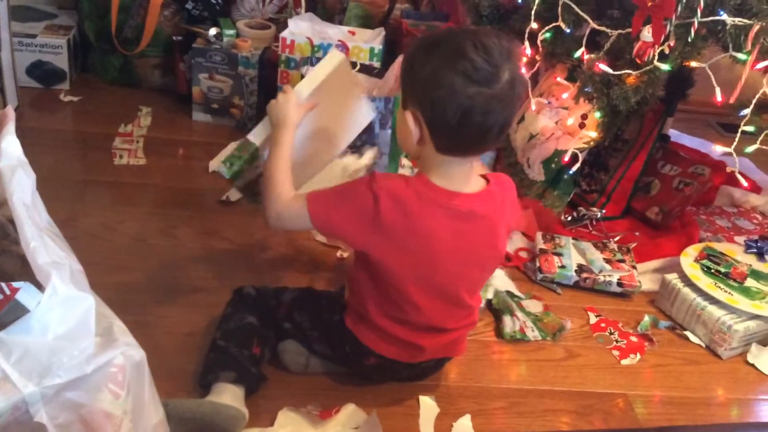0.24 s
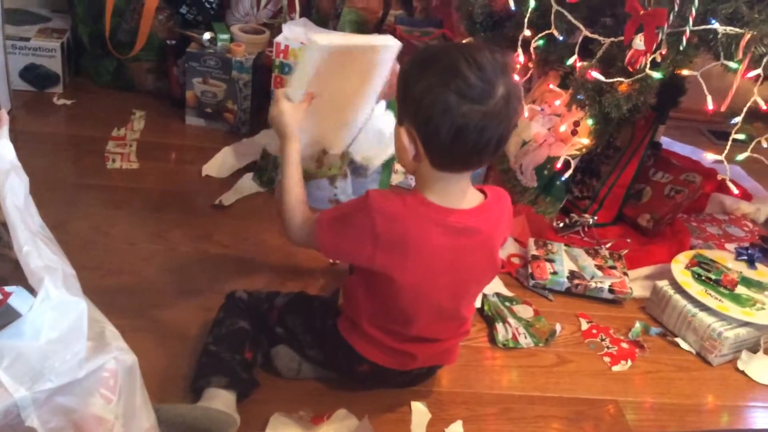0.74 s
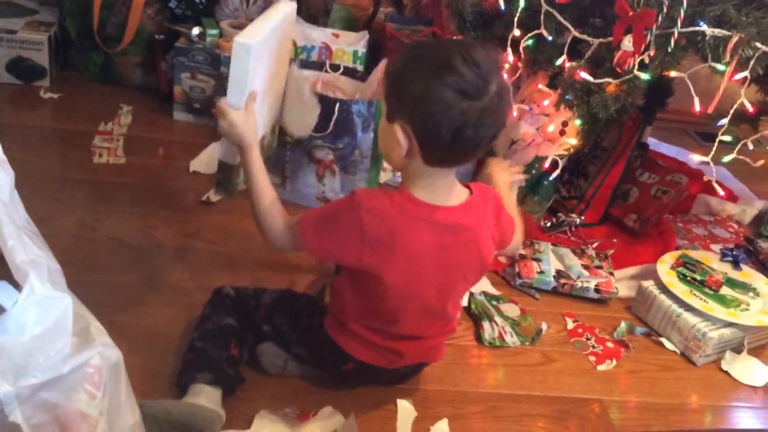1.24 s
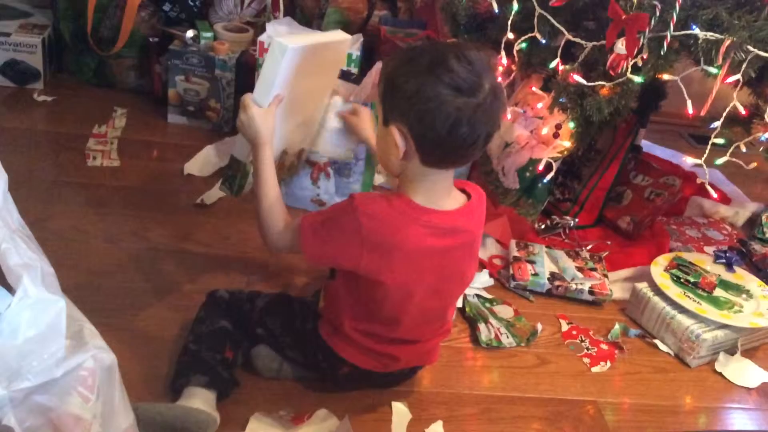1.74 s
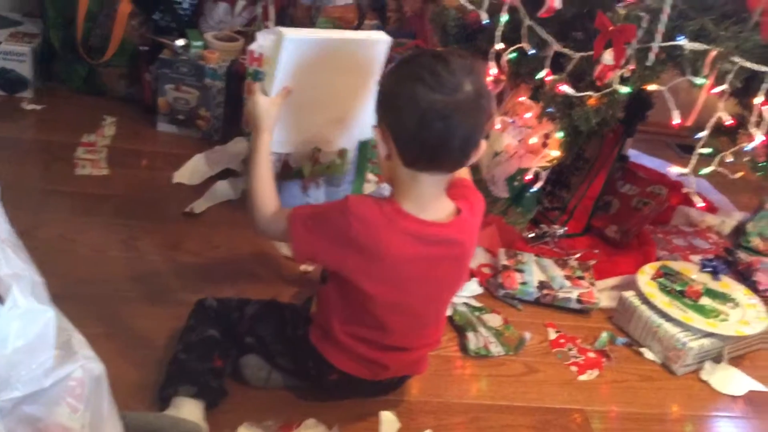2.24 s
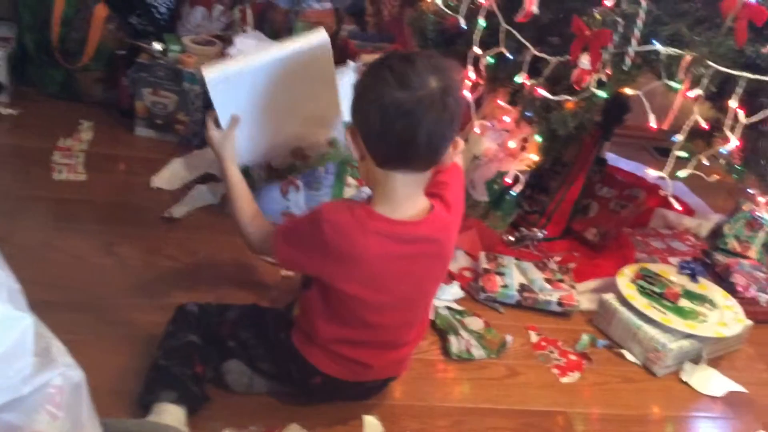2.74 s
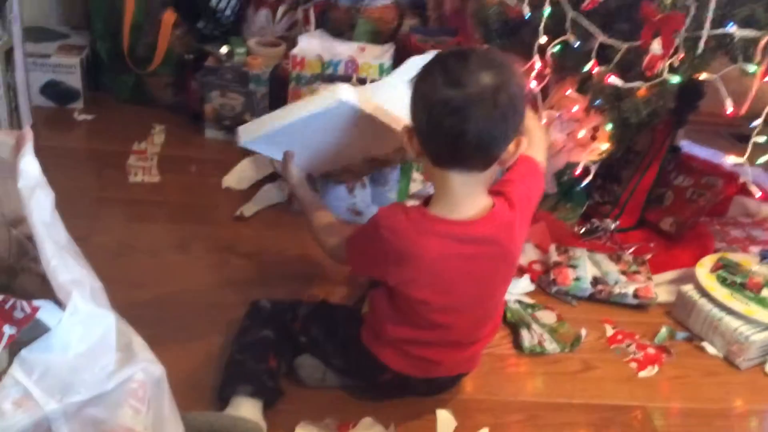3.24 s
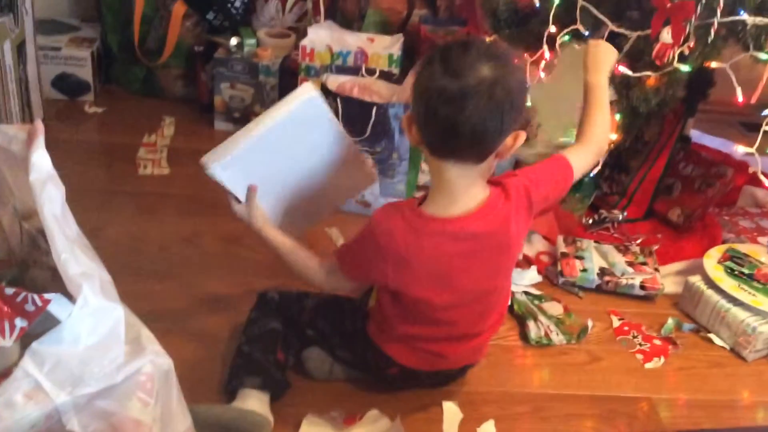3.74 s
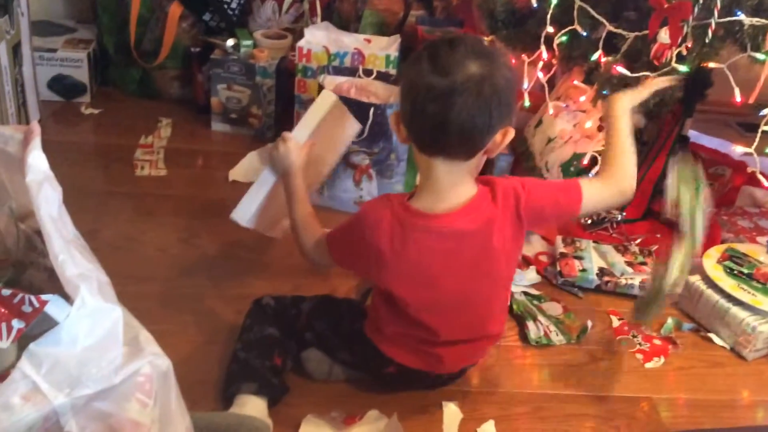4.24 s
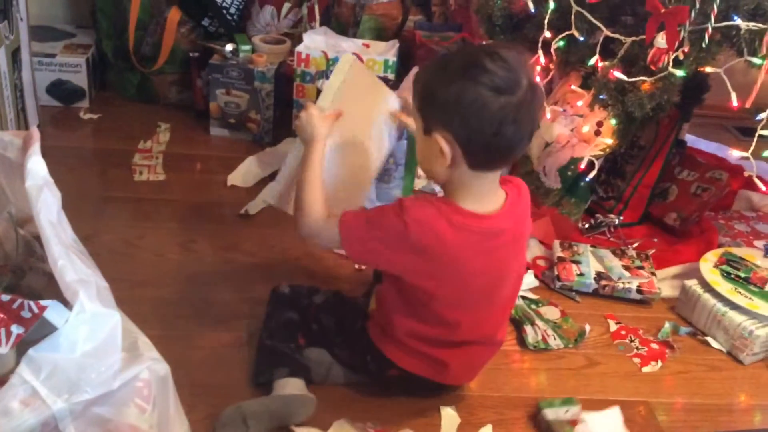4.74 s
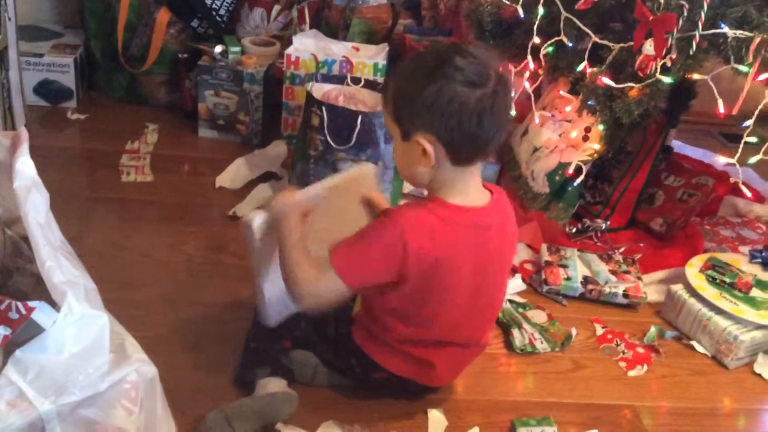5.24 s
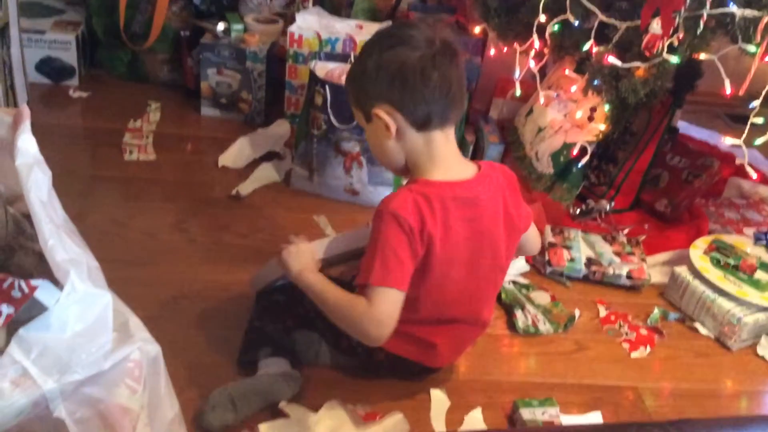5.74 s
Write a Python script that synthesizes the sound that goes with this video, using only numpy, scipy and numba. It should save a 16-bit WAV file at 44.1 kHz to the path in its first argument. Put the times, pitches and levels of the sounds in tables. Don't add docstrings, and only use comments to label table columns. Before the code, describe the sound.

A couple of metres from a phone in a quiet, softly humming living room, hands tear thin gift wrap off a box. Crackles and snapping folds lead to two jerky rips, a pause with small rustles, then the hardest rip frees the sheet. It flutters, lands with a papery slap, and quieter handling ends with a dull hollow box knock.

```python
import sys
import numpy as np
from scipy import signal
from scipy.fft import rfft, irfft
from scipy.io import wavfile
from scipy.ndimage import uniform_filter1d, map_coordinates
from numba import njit

SR = 44100
rng = np.random.default_rng(int(sys.argv[2]) if len(sys.argv) > 2 else 0)


def magnitude_from_level(level_db):
    exponent = np.asarray(level_db, float) / 20
    return 10 ** exponent


def wav_out(sig):
    wavfile.write(sys.argv[1], SR, np.round(np.clip(np.atleast_2d(sig).T, -1, 1) * 32767).astype(np.int16))


N = 263718

# [f/Hz, density/dB per Hz]
HUM_SPECTRUM = [(15, -42), (25, -6), (117, 0), (206, 2.5), (326, -8.5), (427, -5.5), (531, -13.5),
                (754, -17), (1440, -25), (1790, -27), (3160, -31.5), (3430, -31.5), (10400, -33.5),
                (14800, -35), (16000, -46)]
HUM_DB = -59.5

# [f/Hz, density/dB per Hz]
PAPER_SPECTRUM = [(65, -42), (110, -9.5), (350, -20), (396, 0.5), (486, -5), (766, -3), (904, -6.5),
                  (1130, -1), (2340, -1), (3920, 0.5), (4520, 0.5), (12700, -6), (15300, -9)]
LOW_HZ, TOP_HZ = 110, 15350
USUAL_FLAP_DB, USUAL_CRISP_DB = -12, -3

# [t/s, level/dB, crispness/dB]
HANDLING = [(0, -68.5, -4.5), (.42, -73, -8), (1.05, -64.5, -9), (1.3, -69.5, -2), (1.34, -84, -6),
            (1.45, -95, -6), (1.56, -69.5, -9), (2.15, -72, -5), (2.42, -82, -10.5), (2.7, -78, -9),
            (3.72, -70, -24), (4.05, -70.5, -27), (4.08, -60, -25), (4.32, -66.5, -25), (4.37, -70, -19),
            (4.7, -70.5, 1), (5.3, -73, -11), (5.98, -69, 2)]
HANDLING_FLAP_DB = -1.5
# [peak t/s, peak level/dB, 20 dB
# fall/s, flap/dB, crispness/dB]
RUSTLES = [(0.053, -60, -0.14, -18, -8), (0.234, -34.5, 0.0362, -12.5, -13), (.27, -54.5, .2, -3.5, -9.5),
           (.46, -60, 0.44, 0.5, -6), (.544, -60, 0.5, -27, -3), (.65, -47.5, 0.32, -36, -17),
           (1.166, -52.5, 0.06, -16, -14), (1.47, -56, 0.06, -7, -2.5), (1.503, -50, 0.07, -14, -13.5),
           (2.205, -52, 0.05, -5, 3.5), (2.264, -57, 0.1033, -3, 5), (2.29, -68.5, 0.3, -7, -7),
           (2.638, -66, 0.15, 7, -8.5), (2.76, -41.5, 0.06, -16, -16.5), (2.834, -49, 0.11, -2.5, -7),
           (2.906, -54.5, .11, -12, -7), (3.818, -60.5, 0.6, -11, -12), (3.995, -61.5, 0.86, -12, -6.5),
           (4.65, -57.5, 0.07, -5.5, -8), (4.621, -40, -0.03, 1, -10), (5.074, -66.5, 0.16, 10, -20),
           (5.642, -66, 0.17, 17, -20), (5.827, -59, -0.36, 16, -5),
           (1.28, -63.5, -0.17, -15, 0.5), (3.92, -67, 0.1, 12, -17), (4.78, -65, -0.4, -14, -2),
                 (4.97, -67, 0.14, 0, -10), (5.13, -71, 0.1, -7, 0), (5.23, -70, 0.37, -2, 2),
                 (5.43, -66, 0.1, 2, -4), (5.8, -64.5, 0.24, 3, 1), (5.86, -63.5, -0.5, -6, 4.5)]
RUSTLE_SWELL_S = 0.029
# [t/s, pull level/dB, tautness/dB]
RIPS = [
    [(0.706, -56, -6), (0.74, -60, -14), (0.748, -35, -22), (0.768, -44, -3), (0.794, -32, 2.5),
     (0.804, -34, 0), (0.94, -32, 0), (1.05, -66.5, -8)],
    [(1.67, -71, 0), (1.688, -51, -19), (1.71, -57.5, -15), (1.728, -50, -15), (1.776, -52, -7),
     (1.822, -43.5, -12), (1.9, -38.5, 5), (1.974, -43.5, 3.5), (2.114, -69.5, -11)],
    [(3.0, -64, -8), (3.052, -41.5, -3.5), (3.122, -34, -1.5), (3.205, -47.5, -1)],
    [(3.205, -51, -5), (3.214, -30, -0.5), (3.264, -24.5, -3.5), (3.34, -47, -6)],
    [(3.34, -36.5, -10), (3.376, -35.5, -8.5), (3.464, -40.5, -3), (3.532, -54, -14.5), (3.582, -53, -20),
     (3.602, -54, -22), (3.72, -70, -11)],
    [(4.389, -59, -8), (4.394, -35.5, -15), (4.405, -28, -16), (4.45, -41.5, -20), (4.493, -55.5, -19),
     (4.59, -60.5, -13)],
]
RIP_FLAPS_DB = [-9.5, -10, -4.5, -11, -12.5, -16]
FLAP_PER_PULL = -0.12

# [f/Hz, T60/s]
ROOM_T60 = [(250, 0.17), (1000, 0.22), (4000, 0.35), (12000, 0.18)]
ROOM_DB = -11.5

# [t/s, peak level/dB, ring f/Hz, crispness/dB]
POPS = [(.213, -34, 3830, -17), (.235, -24, 4000, -13), (.45, -36.5, 1530, -5.5), (.495, -27.5, 7600, -6),
        (.513, -31, 2530, -17), (.539, -28, 6250, -2.5), (.641, -25, 3220, -5.5), (.696, -31.5, 3930, -4),
        (.746, -29.5, 4000, -3), (.78, -15, 4300, -18), (.793, -32, 4500, -27.5), (1.146, -41, 1920, -5),
        (1.477, -34, 4000, -17), (1.682, -30, 4240, -17), (1.726, -20.5, 4160, -9.5),
        (1.81, -23.5, 3470, 4.5), (1.823, -19.5, 1510, -21), (1.87, -22, 3590, -11),
        (1.886, -18.5, 990, -20), (2.178, -54, 4720, -13), (2.196, -33.5, 5450, -3),
        (2.253, -28.5, 3260, -11), (2.628, -43.5, 1810, -8), (2.754, -45, 2170, -23),
        (2.826, -35, 1440, 0.5), (2.9, -33.5, 1480, -10), (3.016, -25.5, 1300, -40), (3.204, -19, 3560, 0)]
# [t/s, peak level/dB, ring f/Hz, crispness/dB]
LOOSE_POPS = [(3.513, -24.5, 2970, -10), (3.603, -28.5, 1250, -25), (3.676, -39.5, 1590, -13),
              (3.727, -43, 1180, -27), (3.774, -42, 1140, -32), (3.807, -37.5, 1260, -6),
              (3.969, -35, 1110, -14), (4.093, -32.5, 3260, -10), (4.178, -37, 1250, -12),
              (4.394, -21, 1085, -15), (4.401, -21.5, 2270, -10), (4.41, -24, 1400, -28),
              (4.603, -22, 2100, -45), (4.674, -36.5, 2060, -40), (4.9, -46.5, 4500, -8),
              (5.59, -43, 960, -18), (5.604, -36, 902, -9), (5.633, -31, 1040, -14.5),
              (5.818, -37, 4200, -5.5), (5.945, -46, 4700, -8)]
POP_BURST_S = 0.035
POP_BODY_DB, LOOSE_BODY_DB, BODY_DB_PER_OCTAVE = -12.5, -11.5, -4.5

# [t/s, peak level/dB, ring f/Hz, treble share/dB]
TICKS = [(0.2318, -22, 3970, -27), (0.3314, -42, 890, -19), (0.464, -49, 1410, -11),
         (0.4962, -29, 7710, -10), (0.5174, -28.5, 2350, -19), (0.5467, -26, 6060, -32),
         (0.6426, -28.5, 6750, -10), (0.6586, -39, 4100, -16), (0.7001, -34, 3500, -6),
         (0.7127, -33, 3620, -14), (0.7478, -19, 4120, -31), (0.758, -19.5, 6700, -12),
         (0.7713, -21.5, 1630, -13), (0.7844, -12.5, 4130, -7), (0.7956, -12, 7100, -8),
         (1.4673, -42, 9130, -4), (1.6915, -32.5, 4100, -10), (1.718, -37, 2500, -9),
         (1.7311, -28, 1390, -19), (1.7597, -29.5, 4330, -19), (1.798, -28.5, 1560, -15),
         (1.8107, -25, 3540, 0), (1.84, -31, 3260, -1), (1.8683, -24, 3620, -4), (1.873, -20, 7800, -11),
         (1.8837, -16.5, 6700, -0.5), (2.1801, -51, 13740, -2), (2.2122, -37.5, 940, 3),
         (2.2558, -32, 6830, -7), (2.2684, -30.5, 12830, -4)]
# [t/s, peak level/dB, ring f/Hz, treble share/dB]
LATE_TICKS = [(2.6311, -45.5, 1410, -11), (2.737, -50.3, 900, -9), (2.742, -42, 2400, -10),
              (3.0173, -38, 900, -7), (3.6035, -36.5, 1500, -28), (3.678, -41, 2930, -11),
              (4.0687, -41, 2020, -25), (4.2007, -40, 2150, -25), (4.3975, -27.5, 2240, -12),
              (4.759, -46, 8300, -3), (4.7719, -53, 5040, 1), (5.1246, -56, 1070, -9),
              (5.431, -48.5, 915, -12), (5.7995, -47, 11020, -5.5), (5.8228, -32.5, 4220, -21),
              (5.9467, -48.5, 4440, -11)]

# [t/s, squeak f/Hz, level/dB]
SLIDES = [
    [(4.08, 2020, -58), (4.2, 2090, -77.5), (4.3, 2100, -66), (4.39, 2080, -72)],
    [(5.2, 3360, -83), (5.3, 3500, -74), (5.45, 3550, -73), (5.58, 3590, -78)],
]
# [t/s, f/Hz, level/dB, T60/s]
KNOCKS = [
    (5.6, 940, -45, 0.084),
    (5.61, 910, -39.5, 0.065),
    (5.641, 522, -39, 0.054),
    (5.65, 393, -45, 0.085),
    (5.646, 277, -38, 0.036),
    (5.826, 4280, -39, 0.033),
    (5.832, 3800, -42, 0.023),
    (5.836, 4630, -51, 0.029),
    (5.845, 4130, -43.5, 0.032),
]


def level(x, db):
    return x * magnitude_from_level(db) / np.sqrt(np.mean(x ** 2))


def at(table, hz):
    f, v = np.transpose(table)
    return np.interp(np.log(np.maximum(hz, 1)), np.log(f), v)


def band(x, hz, width):
    edges = np.clip([hz - width / 2, hz + width / 2], 5, 0.49 * SR)
    return signal.sosfilt(signal.butter(2, edges, "band", fs=SR, output="sos"), x)


def walk(rate):
    hold = int(SR / rate)
    values = rng.standard_normal(N // 100)[:N // hold + 1]
    return 1.2 * uniform_filter1d(np.repeat(values, hold), hold)[:N]


def hum():
    f = np.arange(N // 2 + 1) * SR / N
    shaped = irfft(rfft(rng.standard_normal(N)) * magnitude_from_level(at(HUM_SPECTRUM, f)), N)
    low = signal.sosfilt(signal.butter(2, 600, fs=SR, output="sos"), shaped)
    high = shaped - low
    return level(low * magnitude_from_level(0.67 * walk(5.7)) + high * magnitude_from_level(0.8 * walk(3.03) - 1.5), HUM_DB)


@njit
def rings(start, hz, t60, size, rise):
    out = np.zeros(N)
    for g in range(len(start)):
        turn = np.exp(2j * np.pi * hz[g] / SR - np.log(1000) / (t60[g] * SR))
        z = size[g] + 0j
        shut = 1.0
        closing = np.exp(-1 / (rise * t60[g] * SR))
        first = max(int(start[g] * SR), 0)
        last = min(int((start[g] + 0.7 * t60[g]) * SR) + 1, N)
        for i in range(first, last):
            z *= turn
            shut *= closing
            out[i] += z.imag * (1 - shut)
    return out


def snaps(chance, ring_s, scatter_db):
    hz = LOW_HZ + TOP_HZ * chance[0] ** 2
    t60 = ring_s * 0.46 * 8 ** (chance[1] ** 2) * (2500 / hz) ** 0.46
    thinning = chance[0] + 0.01
    size_db = at(PAPER_SPECTRUM, hz) - scatter_db * np.log(chance[2] + 1e-9)
    size = magnitude_from_level(size_db) * np.sqrt(thinning / t60)
    return hz, t60, size * np.sign(chance[3] - 0.5)


def tilt(hz, flap_db, crisp_db):
    octave = np.log2(hz / 2500)
    low, high = np.clip(-octave / 2, 0, 1), np.clip(octave / 2, 0, 1)
    return low * (flap_db - USUAL_FLAP_DB) + high * (crisp_db - USUAL_CRISP_DB)


def effort(t):
    power, flap_db, crisp_db = [], [], []
    s, hand_db, taut_db = np.transpose(HANDLING)
    power += [magnitude_from_level(2 * np.interp(t, s, hand_db))]
    flap_db += [HANDLING_FLAP_DB + 0 * t]
    crisp_db += [np.interp(t, s, taut_db)]
    for s, peak_db, fall_s, loose_db, taut_db in RUSTLES:
        swell = np.clip(1 + (t - s) / RUSTLE_SWELL_S, 0, 1) ** 2
        fall_db = 20 * np.maximum(t - s, 0) / max(fall_s, 0.005)
        power += [(swell * magnitude_from_level(peak_db - fall_db)) ** 2]
        flap_db += [loose_db + 0 * t]
        crisp_db += [taut_db + 0 * t]
    for rip, loose_db in zip(RIPS, RIP_FLAPS_DB):
        s, pull_db, taut_db = np.transpose(rip)
        pull_db = np.interp(t, s, pull_db, -200, -200)
        power += [magnitude_from_level(2 * pull_db)]
        flap_db += [loose_db + FLAP_PER_PULL * (pull_db + 39)]
        crisp_db += [np.interp(t, s, taut_db)]
    total = np.sum(power, axis=0)
    share = power / total
    return 10 * np.log10(total), np.sum(share * flap_db, axis=0), np.sum(share * crisp_db, axis=0)


def tearing():
    chance = rng.random((110000, 5)).T
    start = chance[4] * N / SR
    hz, t60, size = snaps(chance, ring_s=0.013, scatter_db=2.0)
    size = size / np.std(rings(start, hz, t60, size, 0.035))
    s = np.arange(0, N / SR, 0.001)
    pull_db, flap_db, crisp_db = (np.interp(start, s, curve) for curve in effort(s))
    jerks = 0.7 * walk(70) + 1.2 * walk(300)
    jerk_db = jerks[(start * SR).astype(int)]
    patches = rng.standard_normal((200, 100))
    patch_db = 3.57 * map_coordinates(patches, [start * 20, chance[0] * 70], order=1, mode="nearest")
    gain_db = pull_db + jerk_db + patch_db + tilt(hz, flap_db, crisp_db)
    return rings(start, hz, t60, size * magnitude_from_level(gain_db), 0.048)


def room(x):
    t = np.arange(SR // 2) / SR
    tail = 0
    for hz in 130 * 2.0 ** np.arange(8):
        noise = band(rng.standard_normal(len(t)), hz, 1.27 * hz)
        tail = tail + noise * magnitude_from_level(-60 * t / at(ROOM_T60, hz))
    tail = tail * np.clip((t - 0.003) / 0.0037, 0, 1)
    return signal.fftconvolve(x, tail / np.sqrt(np.sum(tail ** 2)))[:N] * magnitude_from_level(ROOM_DB)


def pops(folds, body_db):
    s, peak_db, fold_hz, crisp_db = (c[:, None] for c in np.transpose(folds))
    flap_db = body_db + BODY_DB_PER_OCTAVE * np.log2(fold_hz / 2500)
    chance = np.moveaxis(rng.random((len(folds), 500, 5)), 2, 0)
    hz, t60, size = snaps(chance, ring_s=0.0079, scatter_db=2.5)
    done = chance[4]
    favour_db = 6 * np.exp(-(np.log2(hz / fold_hz) / 0.21) ** 2)
    burst_db = -16.0 * (done - 0.2) ** 2
    gain = magnitude_from_level(peak_db + burst_db + favour_db + tilt(hz, flap_db, crisp_db) - 20.5)
    size = gain * size / np.sqrt(np.mean(size ** 2))
    start = s + POP_BURST_S * done
    size = size * magnitude_from_level(1.8 * walk(300)[(start * SR).astype(int) % N])
    return rings(start.ravel(), hz.ravel(), t60.ravel(), size.ravel(), 0.039)


def ticks(creases):
    s, peak_db, fold_hz, treble_db = (c[:, None] for c in np.transpose(creases))
    chance = np.moveaxis(rng.random((len(creases), 10, 2)), 2, 0)
    hz = 900 + 1450 * (np.arange(10) + chance[0])
    size = magnitude_from_level(peak_db - 9 + (treble_db + 4) * np.clip(hz / 9000, 0, 1))
    start = s + 0.0008 * chance[1]
    t60 = 0.0038 * (3000 / hz) ** 0.1
    others = rings(start.ravel(), hz.ravel(), t60.ravel(), size.ravel(), 0.015)
    fold_t60 = 0.0045 * (3000 / fold_hz) ** 0.5
    own = rings(s.ravel(), fold_hz.ravel(), fold_t60.ravel(), magnitude_from_level(peak_db.ravel() - 0.2), 0.02)
    return others + own


def hands():
    t, squeaks = np.arange(N) / SR, 0
    for s, hz, db in map(np.transpose, SLIDES):
        flutter = level(band(rng.standard_normal(N), 40, 70), 0)
        tone = np.sin(2 * np.pi * np.cumsum(np.interp(t, s, hz)) / SR)
        squeaks = squeaks + (0.7 + 0.65 * flutter) * tone * magnitude_from_level(np.interp(t, s, db, -200, -200))
    s, hz, db, t60 = np.transpose(KNOCKS)
    return squeaks + rings(s, hz, t60, magnitude_from_level(db), 0.021)


def scene():
    folds = pops(POPS, POP_BODY_DB) + pops(LOOSE_POPS, LOOSE_BODY_DB)
    paper = tearing() + folds + ticks(TICKS) + ticks(LATE_TICKS)
    near = signal.sosfilt(signal.butter(2, 110, "high", fs=SR, output="sos"), paper + hands())
    return (near + room(near) + hum())[None]


def low_pass(x):
    return signal.sosfilt(signal.butter(12, 16480, fs=SR, output="sos"), x)


def record(dry):
    dry = signal.sosfilt(signal.butter(3, 50, "high", fs=SR, output="sos"), dry)
    dry = signal.sosfilt(signal.ellip(8, 0.5, 24, TOP_HZ, fs=SR, output="sos"), dry)
    return low_pass(dry)


dry = scene()
out = record(dry)
wav_out(out)
```